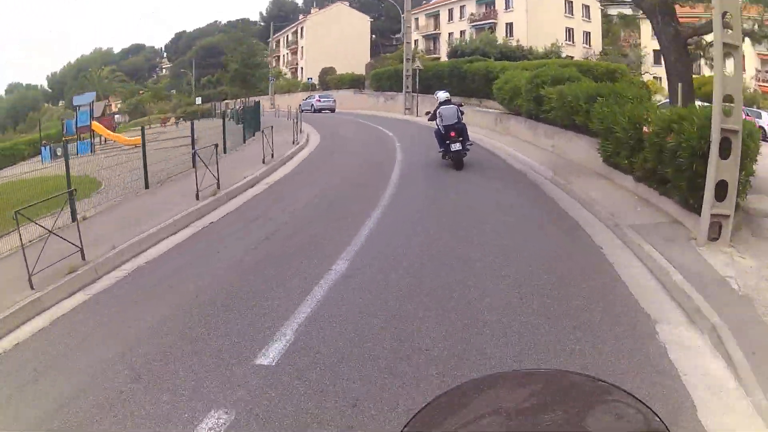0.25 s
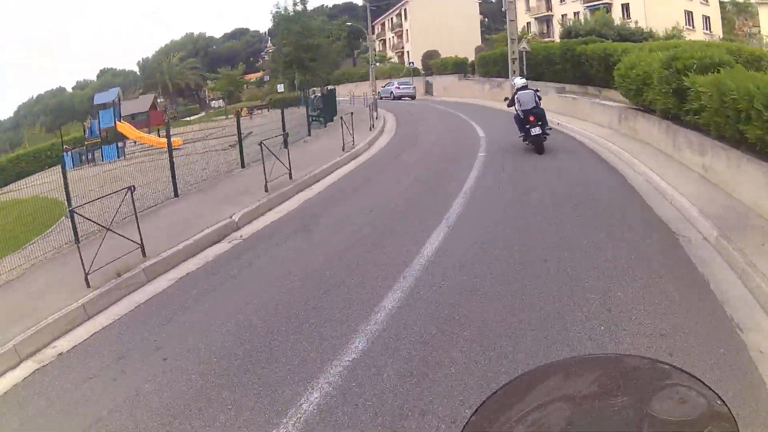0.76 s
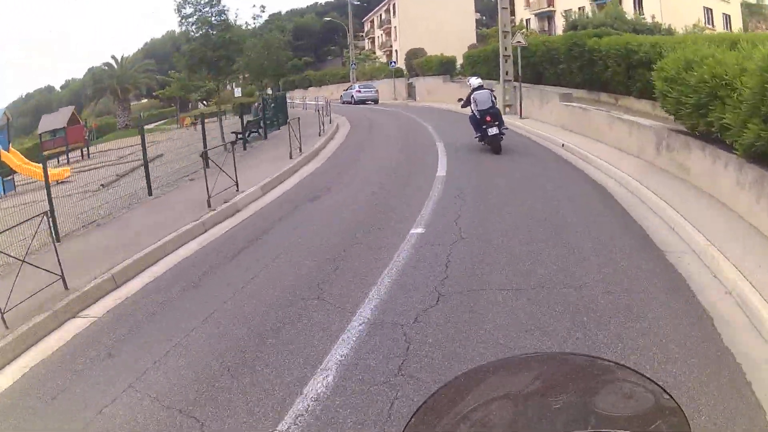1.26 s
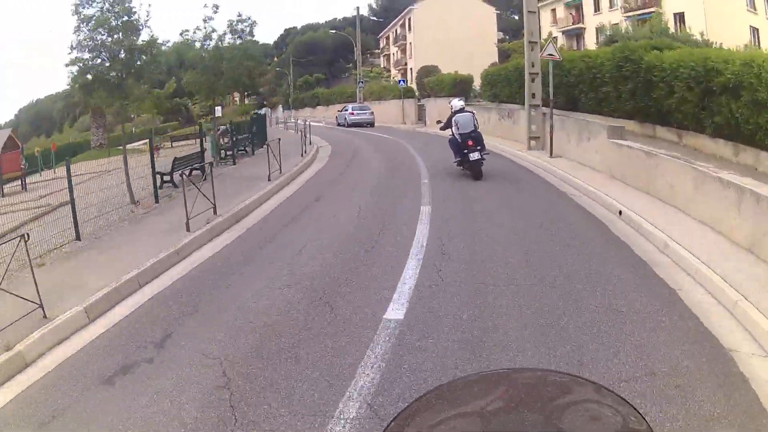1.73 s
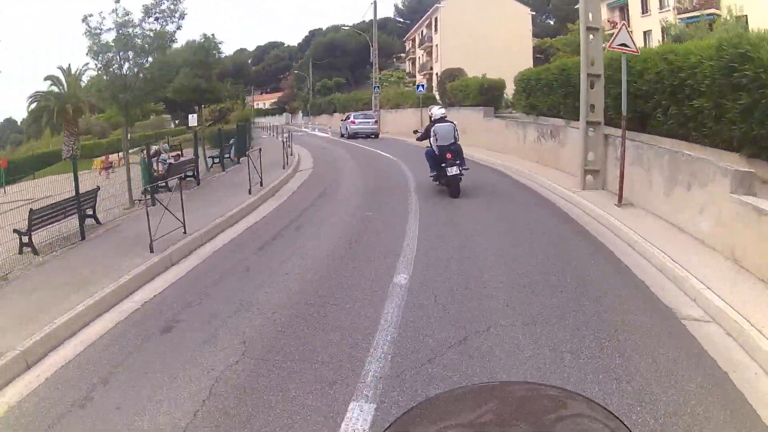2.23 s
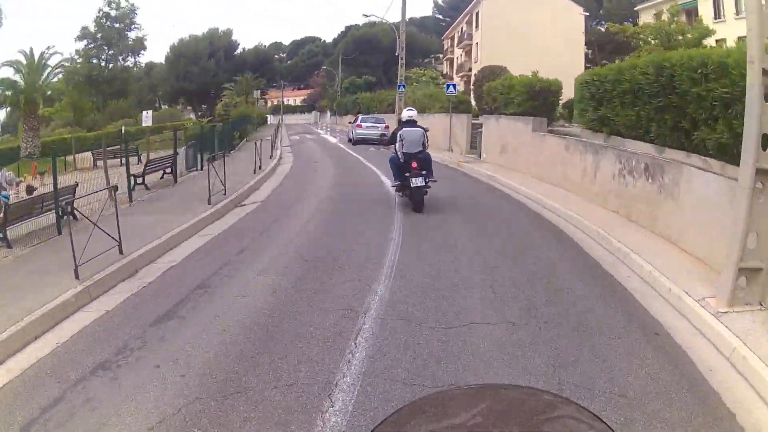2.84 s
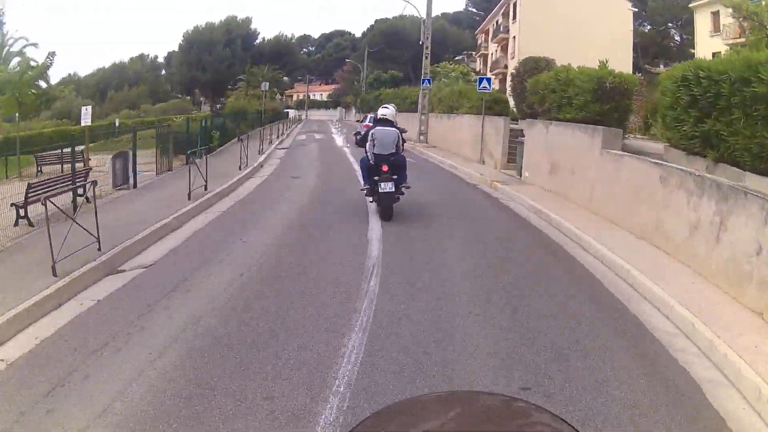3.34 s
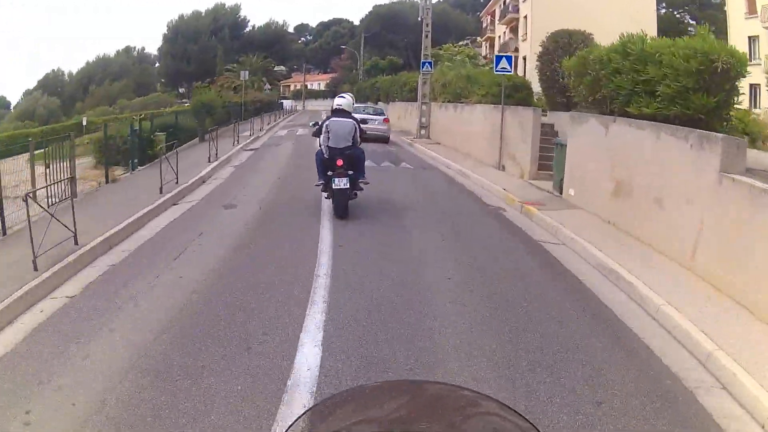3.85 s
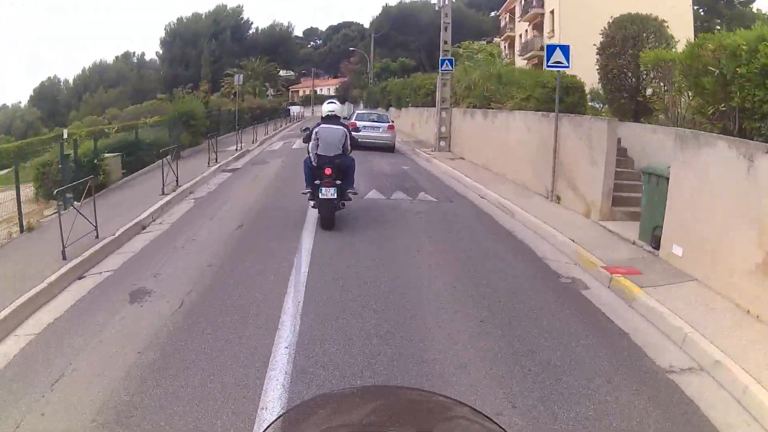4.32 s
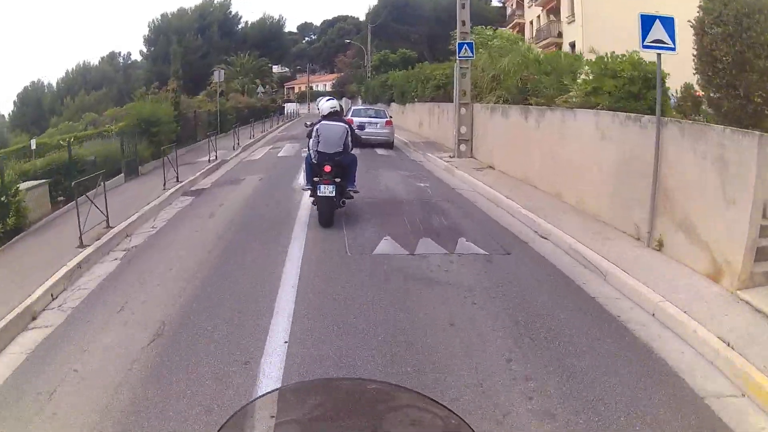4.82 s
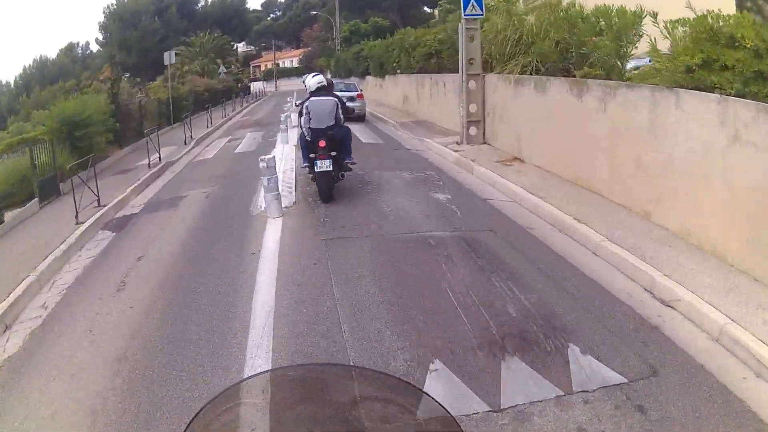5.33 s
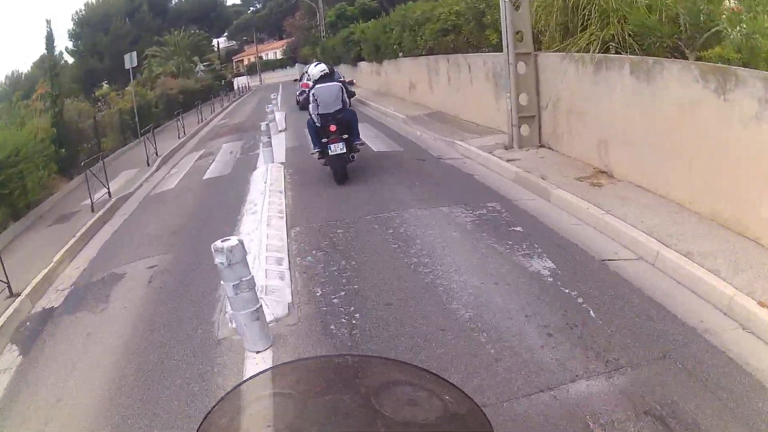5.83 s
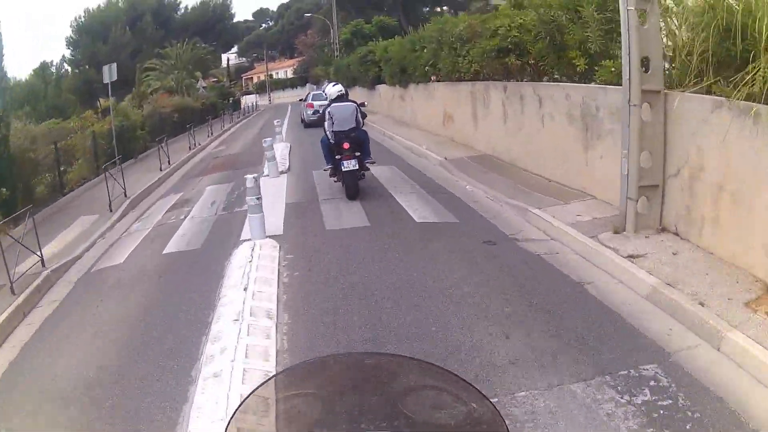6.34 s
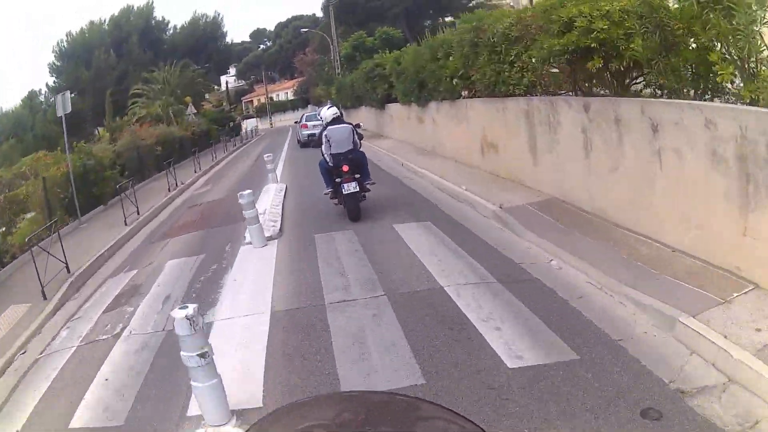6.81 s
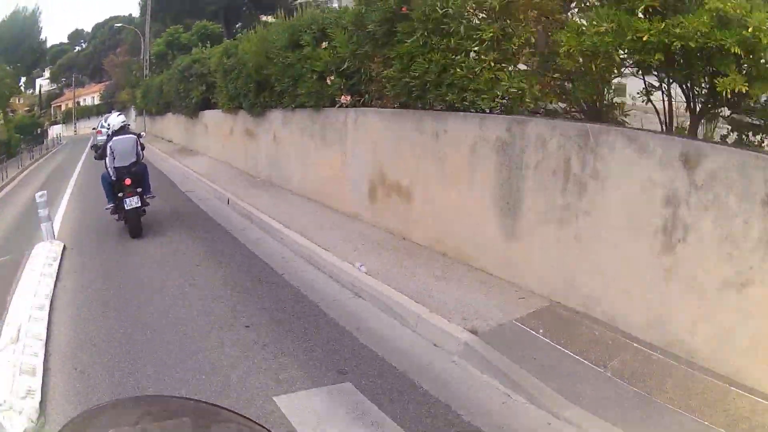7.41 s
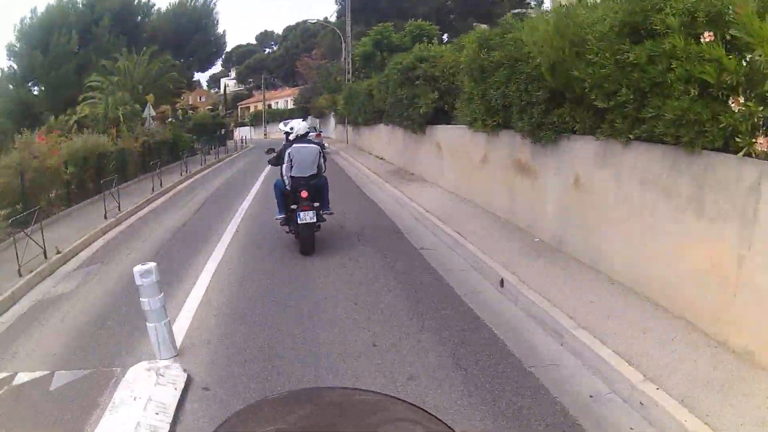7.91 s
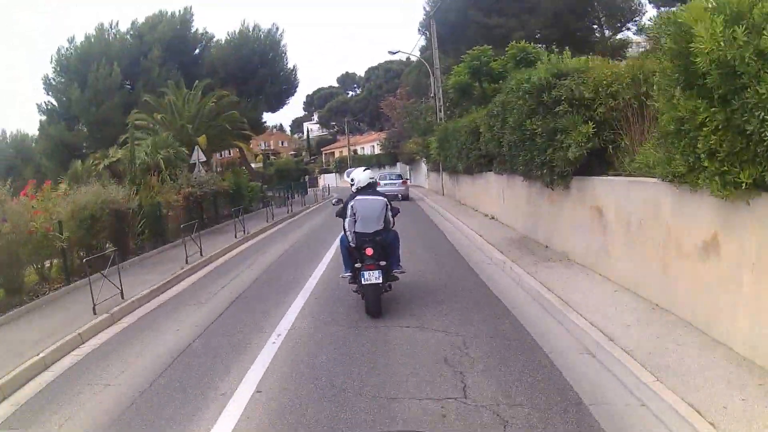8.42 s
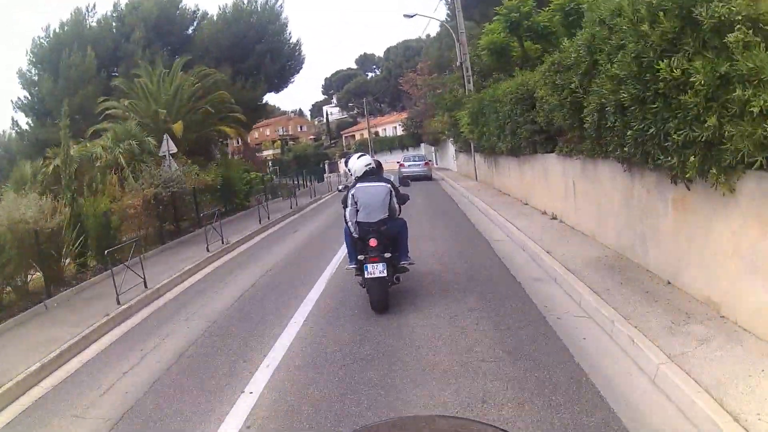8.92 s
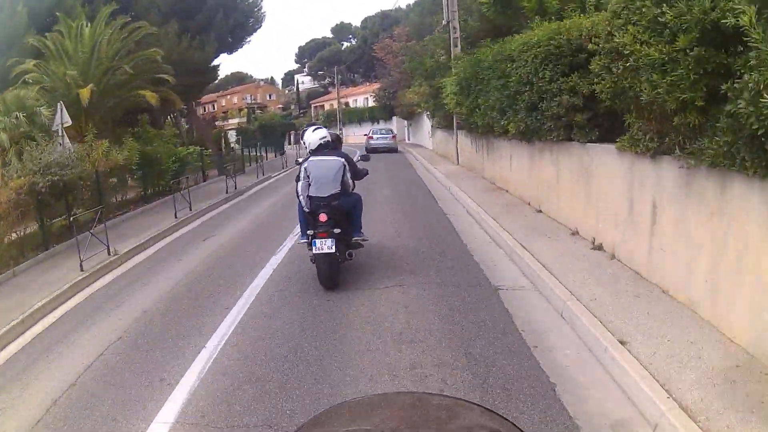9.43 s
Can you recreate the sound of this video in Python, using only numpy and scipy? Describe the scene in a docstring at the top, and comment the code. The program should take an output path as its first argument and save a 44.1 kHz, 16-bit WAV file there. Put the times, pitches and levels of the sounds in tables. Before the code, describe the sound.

Wind buffets the microphone on a moving motorcycle as its engine runs, slows down and picks up speed again.

```python
"""A V-twin motorcycle barks through a bend under booming wind, coasts to a speed hump and pulls away.
We ride with a camera on the bike: firings ring the exhaust pipe, valves tick and a loose part rattles.
Vortices throb behind the windscreen, air rushes over the camera case and rough road knocks its mount.
The case's resonances colour the exhaust, the metal and the rush.
Far beneath it all, the camera's electronics hiss and add a faint whine that chirps with each frame."""
import sys
import numpy as np
from scipy import signal
from scipy.fft import rfft, irfft, next_fast_len
from scipy.io import wavfile
from scipy.ndimage import uniform_filter1d, map_coordinates

SR = 44100
rng = np.random.default_rng(int(sys.argv[2]) if len(sys.argv) > 2 else 0)


def waveform_to_disk(signal):
    """Save audio, clipped to [-1, 1], as 16-bit WAV at the path in sys.argv[1]."""
    frames = np.transpose(np.atleast_2d(signal))
    scaled = np.clip(frames, -1, 1) * 32767
    samples = np.round(scaled).astype(np.int16)
    wavfile.write(sys.argv[1], SR, samples)


N = 426006
TIME = np.arange(N) / SR
CRUISE_RATE = 30  # four-stroke cycles a second

# The revs. Each row: time in seconds, four-stroke cycles a second.
ENGINE_RATE = [(0, 36), (.5, 37.1), (1, 38.5), (1.5, 39.35), (1.8, 39.1), (2.3, 38), (2.8, 36.2),
               (3.6, 31.2), (4.3, 26.7), (5.5, 23.2), (6.2, 23.7), (6.5, 24.45), (7.5, 27.65), (8.5, 30.2),
               (9.66, 28.6)]
# How hard the throttle drives the firings. Each row: time in seconds, level in dB.
THROTTLE = [(0, -36), (.6, -33), (1.6, -33), (1.9, -50), (5.7, -51), (5.95, -44), (6.4, -38.5),
            (7.5, -36.5), (8.3, -36), (8.7, -43), (9.66, -44)]
# The ring of the camera case. Each row: centre in Hz, width in Hz, lift in dB.
CASE_MODES = [(1023.4, 174, 9.5), (1170, 214, 4.5), (1308, 127, 9.5), (1690, 320, 2.5), (2710, 200, -2),
              (4287, 317, 11), (6270, 700, 8)]
# The tone of clattering, knocking metal. Each row: frequency in Hz, relative level in dB.
METAL_TONE = [(200, -20.5), (600, 0.5), (1000, -1.5), (1500, 1.5), (1900, 4.5), (2300, -7), (2700, -5),
              (3200, -14.5), (3900, -6), (4900, -19), (7200, -29), (10000, -31), (15000, -64)]


def engine():
    """Exhaust, drone, valve gear and rattle, all locked to one crankshaft."""
    rate, = curves(ENGINE_RATE)
    cycles = np.cumsum(rate) / SR
    lugging = rate.mean() - rate  # positive at low revs
    return exhaust(cycles, lugging) + drone(cycles, lugging) + clatter(cycles) + rattle(cycles, rate)


def exhaust(cycles, lugging):
    """Two cylinders fire 270 and 450 degrees apart; the throttle sets how hard the pipe barks."""
    # The pipe's broad tone. Each row: frequency in Hz, relative level in dB.
    pipe_tone = [(40, -24), (100, 1.5), (150, -9.5), (230, -6.5), (320, 0.5), (470, 1.5), (680, -11),
                 (870, -3.5), (1100, -13), (1800, -12.5), (3000, -21.5), (4300, -31), (6000, -37),
                 (12000, -49)]
    # The pipe's resonances and one notch. Each row: centre in Hz, width in Hz, lift in dB.
    pipe_modes = [(126, 29, 8), (299, 89, 4), (473, 53, 10.5), (543, 29, -3), (587.4, 54, 10),
                  (825, 120, 9.5)]
    front = strokes(cycles, scatter_db=0.1, jitter_s=0.00005)
    # At low revs the rear cylinder stands out and combustion is rougher.
    rear = amp(-8 + 0.6 * lugging) * strokes(cycles - 270 / 720, scatter_db=1.5, jitter_s=0.00007)
    rasp = amp(-10 + 0.5 * lugging) * unit(puffs(front + rear, decay_s=0.007))
    firings = rasp - unit(front + rear)
    throttle_db, = curves(THROTTLE)
    return amp(throttle_db) * coloured(street_echoes(firings), pipe_tone, CASE_MODES + pipe_modes)


def street_echoes(x, drift_s=0.00016):
    """Road and walls add copies whose delays drift as the bike moves."""
    # Each row: delay in seconds, echo level in dB.
    echoes = [(.0031, -5.5), (.0074, -8), (0.0117, -12.5), (0.016, -14.5)]
    return x + sum(amp(db) * np.interp(TIME - delay - drift_s * wobble(1.475), TIME, x)
                   for delay, db in echoes)


def drone(cycles, lugging):
    """Low engine orders hum on with the throttle shut, and swell at low revs."""
    # Each row: multiple of the cycle rate, base level in dB.
    orders = [(3, -52.5), (4, -48), (5, -48.5), (6, -54)]
    throttle_db, = curves(THROTTLE)
    hum = sum(amp(db + 1.8 * wobble(4)) * np.sqrt(2) * np.sin(2 * np.pi * order * cycles)
              for order, db in orders)
    return amp(0.17 * (throttle_db - throttle_db.mean()) + 0.22 * lugging) * hum


def clatter(cycles):
    """Valves tick four times a cycle over the whirr of gears and chain."""
    # Each row: time in seconds, level in dB.
    clatter_levels = [(0, -38), (.7, -31), (1.63, -28.5), (1.72, -36.5), (1.95, -37), (2.15, -34),
                      (2.85, -33), (4, -39), (5.55, -41), (6.1, -37.5), (8.1, -36), (8.45, -38.5),
                      (9.66, -36.5)]
    ticks = strokes(4 * cycles, scatter_db=4, jitter_s=0.0008)
    metal = noise() + amp(-9.5) * unit(puffs(ticks, decay_s=0.0019))
    level_db = curves(clatter_levels)[0] + 0.75 * wobble(14)
    return amp(level_db) * coloured(metal, METAL_TONE, CASE_MODES)


def rattle(cycles, rate, shake_hz=24.46, half_width_hz=0.18, shake_db=8):
    """A loose part ticks once a cycle, harder under load and as low revs cross its resonance."""
    # Each row: frequency in Hz, relative level in dB.
    tinny_tone = [(500, -38), (1800, -1.5), (3200, -12.5), (4200, -2.5), (4800, -21), (5600, -23),
                  (7800, -20.5), (10000, -31), (14000, -52)]
    ticks = puffs(strokes(cycles, scatter_db=2, jitter_s=0.0002), decay_s=0.0022)
    resonance_db = shake_db / (1 + ((rate - shake_hz) / half_width_hz) ** 2)
    level_db = curves(THROTTLE)[0] - 15.5 + 0.22 * (CRUISE_RATE - rate) + resonance_db
    return amp(level_db) * coloured(ticks, tinny_tone, CASE_MODES)


def wake(boom_hz=41, wander_cycles=0.11, attack_s=0.065, release_s=0.1):
    """Vortices shed by the windscreen throb at one low, unsteady pitch: a murmur surging into booms."""
    # The wake locks into a boom. Each row: start in seconds, length in seconds, level in dB.
    booms = [(0.074, 0.19, -24), (0.314, .14, -22.5), (0.485, .23, -17), (.73, 0.3, -24.5),
             (.99, 0.42, -19), (1.416, .45, -15.5), (1.86, 0.23, -14), (2.07, 0.18, -21),
             (2.232, 0.78, -18), (3.004, .42, -22), (3.542, 0.19, -20.5), (3.76, .23, -23.5),
             (4.253, 0.29, -24), (5.04, .29, -29.5), (5.61, 0.21, -30.5), (5.915, .19, -28),
             (6.22, 0.24, -28), (6.666, 0.18, -29.5), (6.893, .2, -29.5), (7.37, 0.22, -24.5),
             (7.72, 0.22, -25.5), (8.175, .2, -29.5), (8.54, 0.17, -25), (8.712, 0.2, -20),
             (8.905, .24, -19.5), (9.14, 0.16, -22), (9.454, 0.17, -22)]
    throb = unit(np.sin(2 * np.pi * (boom_hz * TIME + wander_cycles * wobble(9))))
    swirl = coloured(noise(), [(8, -10), (25, -5), (45, 14), (70, -9), (200, -46), (1000, -100)])
    surges = [amp(db) * arch(start, length, attack_s, release_s) for start, length, db in booms]
    murmur = amp(-32 + 0.35 * airflow()) * unit(amp(4 * wobble(16)))
    return np.maximum(np.max(surges, axis=0), murmur) * (throb + amp(-12) * swirl)


def buffeting(cruise_db=-36.5, gust_width_s=0.06):
    """Eddies slap the case with a lumpy rumble that grows with airflow and revs."""
    # Each row: time of the peak in seconds, dB over the steady buffeting.
    gusts = [(0.556, 7.5), (2.37, 4.5), (2.74, 5), (3.04, 4), (3.25, 6.5)]
    # Each row: frequency in Hz, relative level in dB.
    rumble_tone = [(15, -22), (40, -4), (65, 2), (95, 1), (125, -1.5), (175, -5), (240, -9.5), (320, -7.5),
                   (420, -23.5), (1000, -46), (8000, -100)]
    # Air trapped behind the windscreen. Each row: centre in Hz, width in Hz, lift in dB.
    cavity_modes = [(76, 14, 2.5), (150.1, 11, 8), (197, 25.4, 14)]
    rate, = curves(ENGINE_RATE)
    steady_db = cruise_db + 0.55 * airflow() + 0.2 * (rate - CRUISE_RATE)
    gust_db = sum(db * np.exp(-((TIME - peak) / gust_width_s) ** 2) for peak, db in gusts)
    lumps_db = 0.7 * wobble(8)
    rumble = coloured(noise() * amp(1.26 * wobble(30)), rumble_tone, cavity_modes)
    return amp(steady_db + gust_db + lumps_db) * rumble


def wind_rush(cruise_db=-34, flicker_db=0.58):
    """Air streams over the case and rings its resonances."""
    # Each row: frequency in Hz, relative level in dB.
    rush_tone = [(100, -10.5), (300, 0), (500, -6), (820, -4.5), (1000, -1), (1350, -2.5), (1500, -8.5),
                 (2000, -8.5), (3000, -14.5), (4200, -28.5), (5500, -33), (9000, -58), (15000, -69)]
    rush = coloured(noise() * amp(1.3 * wobble(90)), rush_tone, CASE_MODES)
    return amp(cruise_db + airflow() + flicker_db * wobble(11)) * rush


def airflow(cruise_db=-33):
    """Strength of the air over the camera, in dB above cruising."""
    # Each row: time in seconds, strength in dB.
    flow_levels = [(0, -31.5), (.4, -35.5), (.7, -33), (1.62, -28.5), (1.8, -31), (1.95, -29), (2.4, -29.5),
                   (2.83, -25.5), (3.15, -31), (3.7, -32.5), (4.1, -36.5), (5.1, -34), (6.3, -39.5),
                   (7.4, -40), (7.8, -35), (8.4, -34), (9.3, -31), (9.66, -36.5)]
    return curves(flow_levels)[0] - cruise_db


def jolts():
    """Rough road knocks the case on its mount."""
    # Each row: start in seconds, relative strength in dB.
    bumps = [(1.825, -13), (1.903, -15), (2.459, -31), (2.84, -20), (2.867, -12), (3.237, -24)]
    starts, db = np.transpose(bumps)
    blows = np.bincount((starts * SR).astype(int), amp(db), N)
    knocks = puffs(blows, decay_s=0.0079)
    return amp(-11) * np.std(knocks) * coloured(knocks, METAL_TONE, CASE_MODES)


def whine(busy_hz=8750, idle_hz=10960, flutter_hz=360, frame_rate=29.92, busy_share=0.3):
    """The camera's power supply sings: lower while it works on a frame, silent in short pauses."""
    frames = frame_rate * TIME + 0.3
    short_job = uniform_filter1d((frames % 1 < busy_share).astype(float), size=70)
    long_job = uniform_filter1d((frames.astype(int) % 15 == 13).astype(float), size=70)  # one frame in 15
    busy = np.maximum(short_job, 0.94 * long_job)
    flutter = flutter_hz * (1 + 0.446 * busy) * wobble(2300)
    pitch_hz = idle_hz + busy * (busy_hz - idle_hz) + flutter + 120 * wobble(70) + 70 * wobble(2.8)
    tone = np.sin(2 * np.pi * np.cumsum(pitch_hz) / SR)
    return amp(-58 + 5.24 * short_job) * ~pauses() * tone


def pauses(every_s=0.33, length_s=0.036, unevenness=0.08):
    """True during the short rests that the electronics take."""
    cycles = TIME / every_s + unevenness * wobble(3)
    return cycles % 1 > 1 - length_s / every_s


def hiss(level_db=-64.5):
    """The camera's own thin, steady noise floor."""
    # Each row: frequency in Hz, relative level in dB.
    hiss_tone = [(1000, 3), (5000, -15), (7300, -2), (9000, 4), (11500, 9), (12400, 1), (14000, 2),
                 (14500, -7), (15600, -2)]
    return amp(level_db) * coloured(noise(), hiss_tone)


def strokes(turns, scatter_db, jitter_s):
    """An impulse at each whole turn, uneven in size and time."""
    on_beat = np.interp(np.arange(1, int(turns[-1])), turns, np.arange(N))
    size_spread, time_spread = rng.standard_normal((len(on_beat), 2)).T
    at = np.clip(on_beat + time_spread * jitter_s * SR, 0, N - 1).astype(int)
    return np.bincount(at, amp(scatter_db * size_spread), N)


def puffs(blows, decay_s):
    """Each impulse releases a burst of noise that dies away exponentially."""
    return signal.lfilter([1], [1, -np.exp(-1 / (decay_s * SR))], blows) * noise()


def coloured(x, tone, modes=()):
    """x through a causal filter of (Hz, dB) points and resonances, at rms 1."""
    size = 2 * next_fast_len(N // 2 + 8192)
    hz = np.fft.rfftfreq(size, 1 / SR)
    tone_hz, tone_db = np.transpose(tone)
    db = np.interp(np.log(hz + 1), np.log(tone_hz), tone_db)
    db += sum(lift / (1 + (2 * (hz - centre) / width) ** 2) for centre, width, lift in modes)
    cepstrum = irfft(np.log(amp(db)))[:size // 2]
    response = np.exp(2 * rfft(cepstrum, size))  # minimum phase: the ring follows the hit
    return unit(irfft(rfft(x, size) * response)[:N])


def arch(start, length, attack, release):
    """A smooth envelope: attack, hold, release."""
    ramps = np.clip((TIME - start) / attack, 0, 1) * np.clip((start + length - TIME) / release, 0, 1)
    return np.sin(np.pi / 2 * ramps)


def curves(rows):
    """One value per sample for each column after the time."""
    times, *columns = np.transpose(rows)
    return [np.interp(TIME, times, column) for column in columns]


def wobble(rate):
    """A smooth random curve, rate knots a second."""
    return map_coordinates(rng.standard_normal(int(N * rate / SR) + 4), [TIME * rate])


def noise():
    """Fresh white noise."""
    return rng.standard_normal(N)


def amp(db):
    """Decibels to gain."""
    return 10 ** (np.asarray(db) / 20)


def unit(x):
    """Scaled to rms 1."""
    return x / np.sqrt(np.mean(x ** 2) + 1e-20)


def scene():
    """Engine, wind, road knocks and the camera's own noise at one microphone."""
    return (engine() + wake() + buffeting() + wind_rush() + jolts() + whine() + hiss())[None]


def record(dry):
    """The camera keeps nothing above its band limit."""
    top_hz = 15700
    return irfft(rfft(dry) * (np.fft.rfftfreq(N, 1 / SR) < top_hz), N)


dry = scene()
out = record(dry)
waveform_to_disk(out)
```